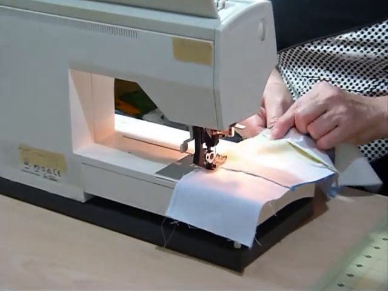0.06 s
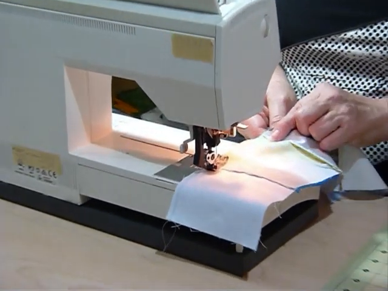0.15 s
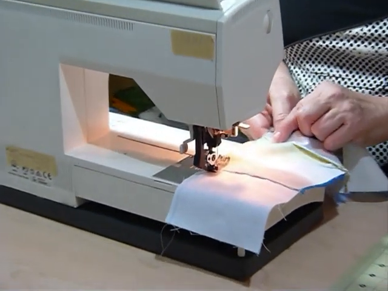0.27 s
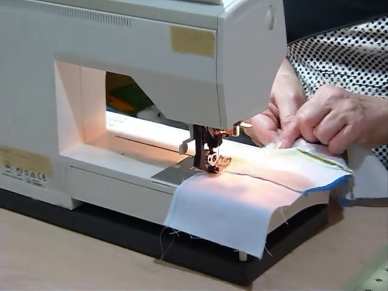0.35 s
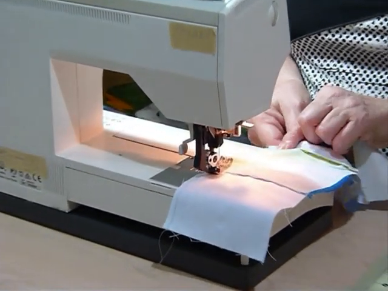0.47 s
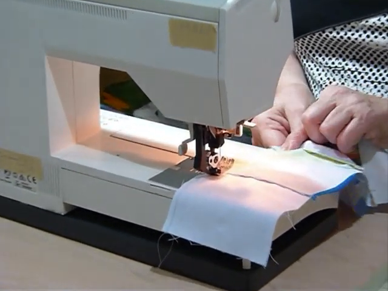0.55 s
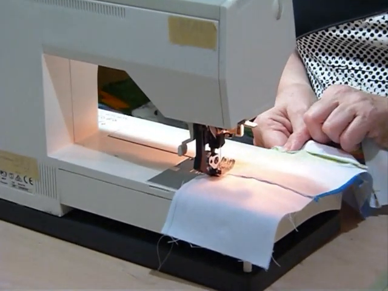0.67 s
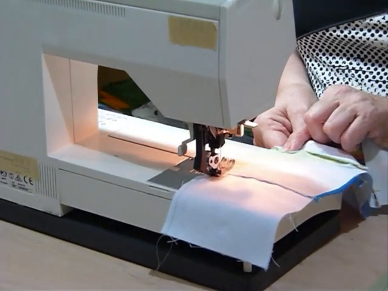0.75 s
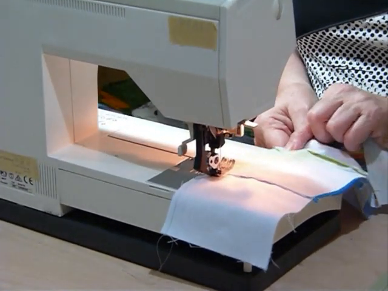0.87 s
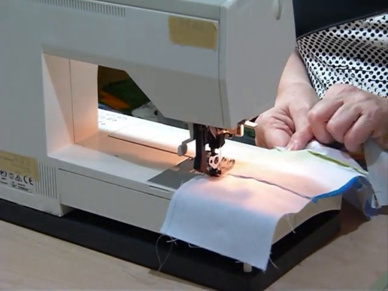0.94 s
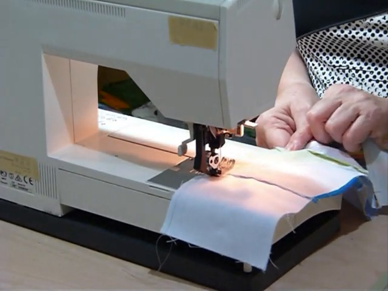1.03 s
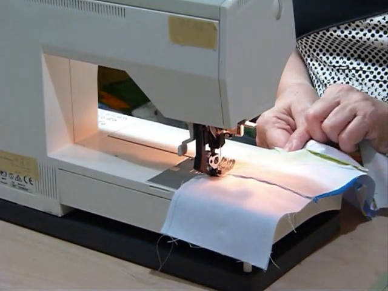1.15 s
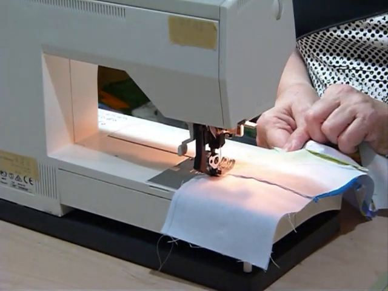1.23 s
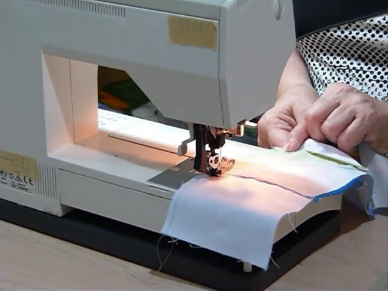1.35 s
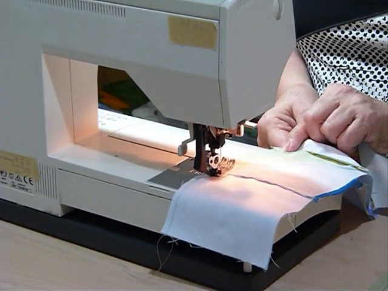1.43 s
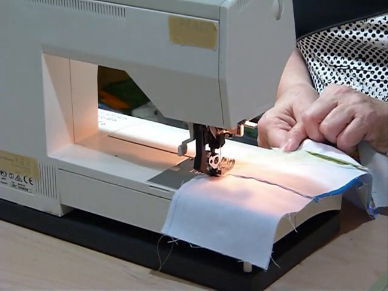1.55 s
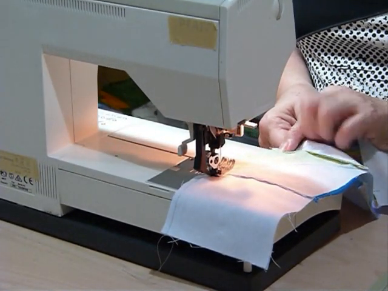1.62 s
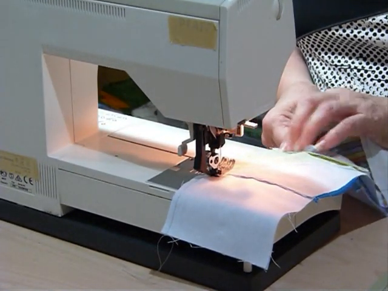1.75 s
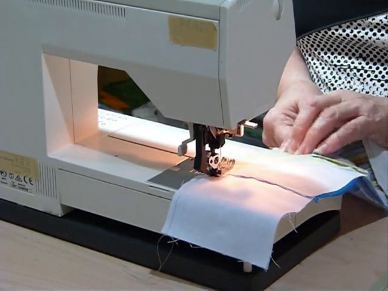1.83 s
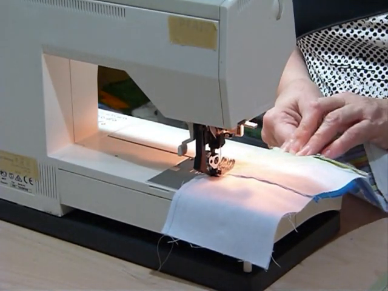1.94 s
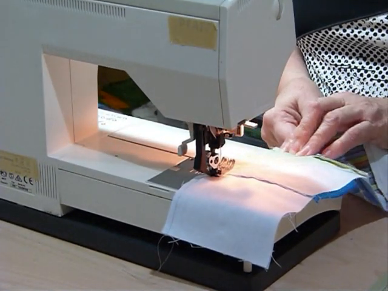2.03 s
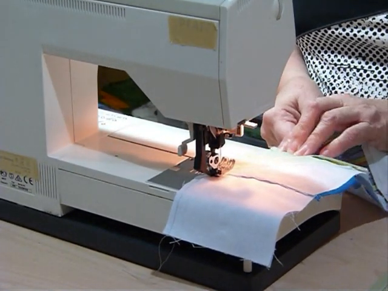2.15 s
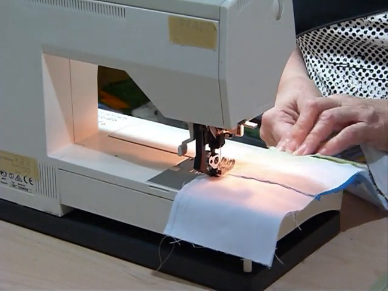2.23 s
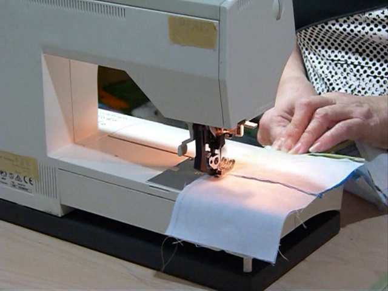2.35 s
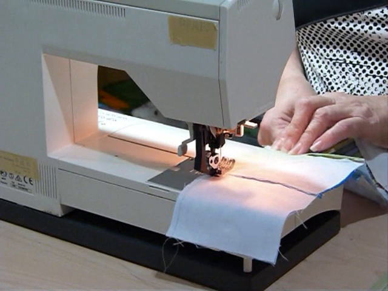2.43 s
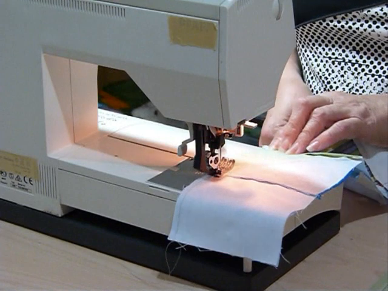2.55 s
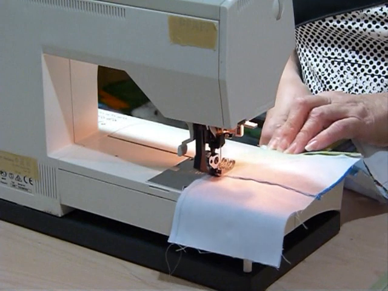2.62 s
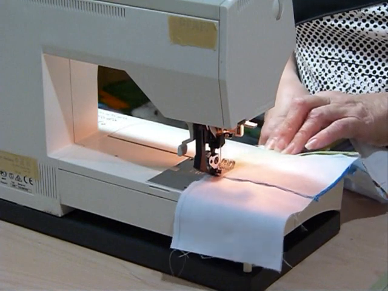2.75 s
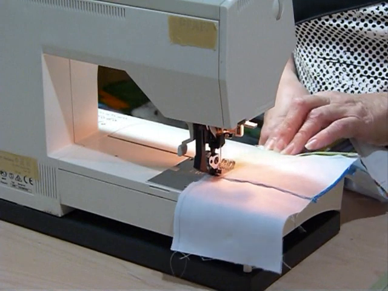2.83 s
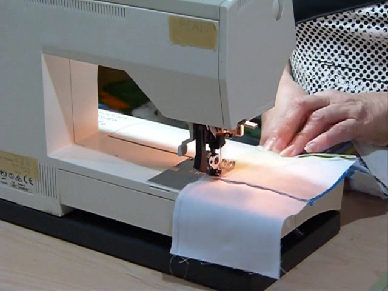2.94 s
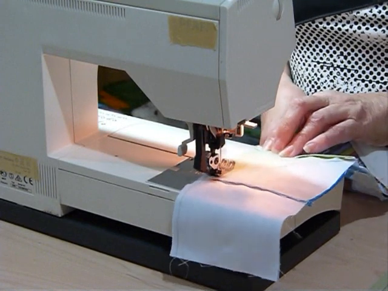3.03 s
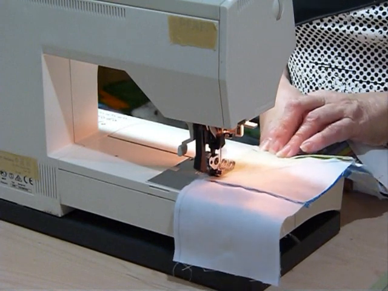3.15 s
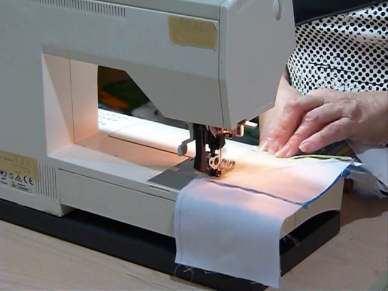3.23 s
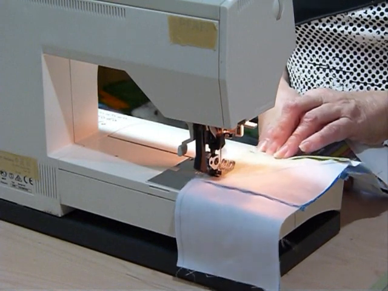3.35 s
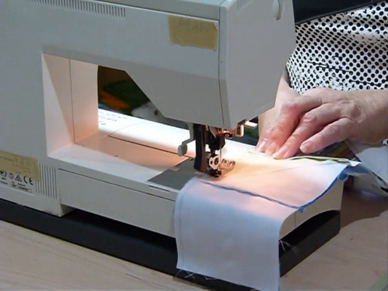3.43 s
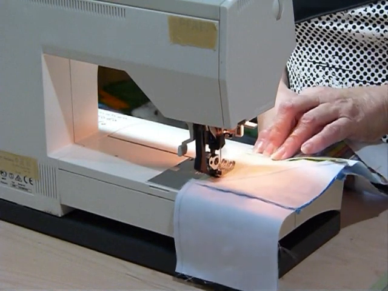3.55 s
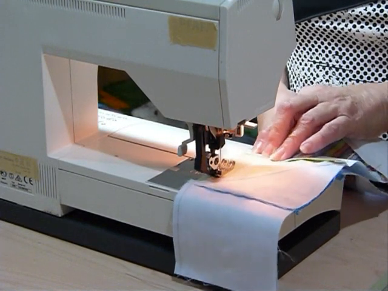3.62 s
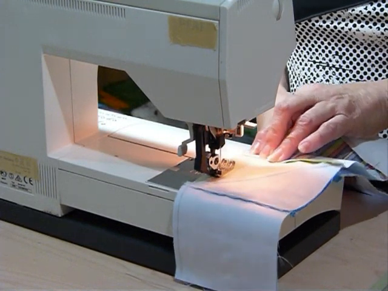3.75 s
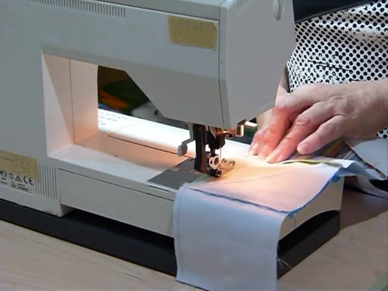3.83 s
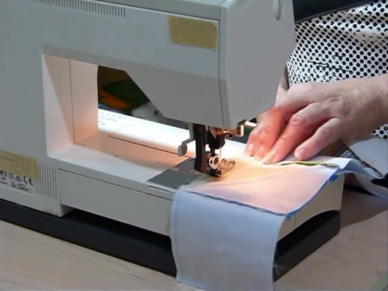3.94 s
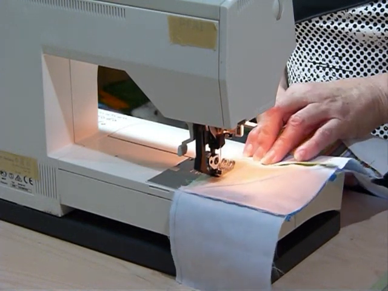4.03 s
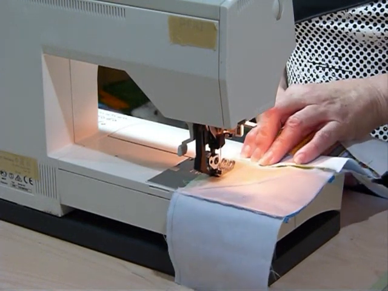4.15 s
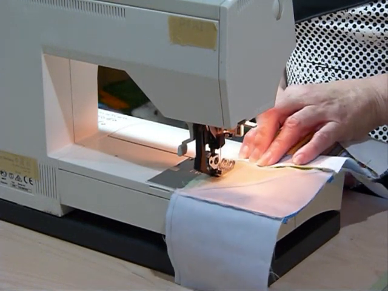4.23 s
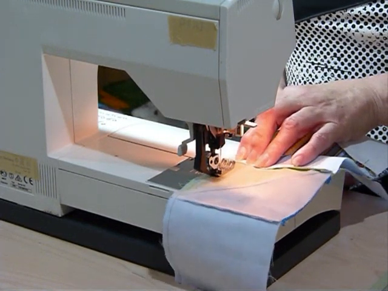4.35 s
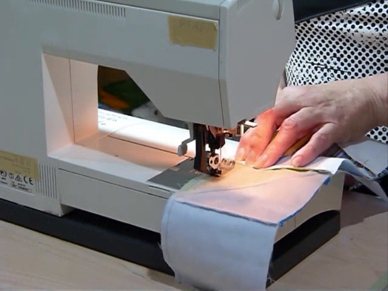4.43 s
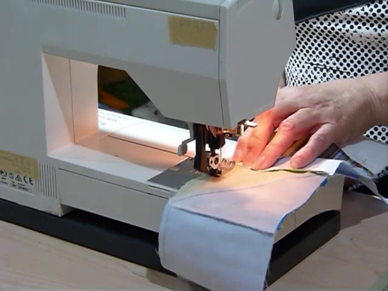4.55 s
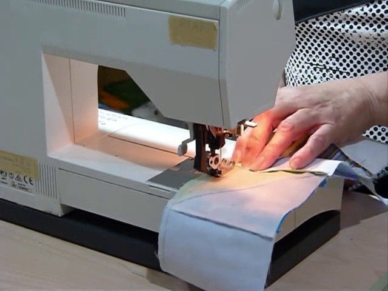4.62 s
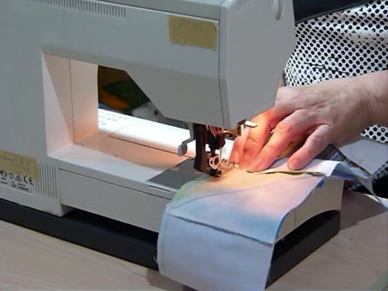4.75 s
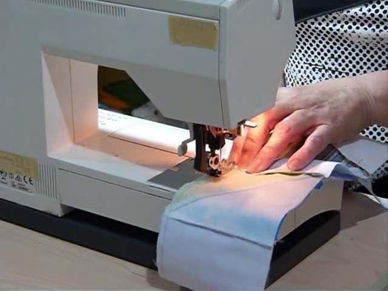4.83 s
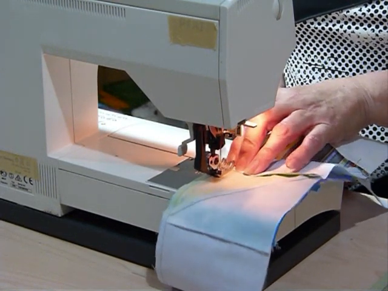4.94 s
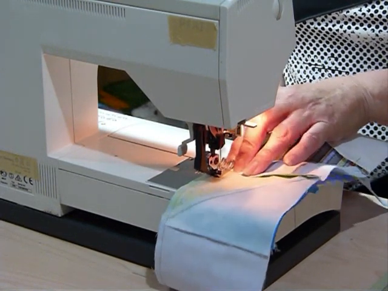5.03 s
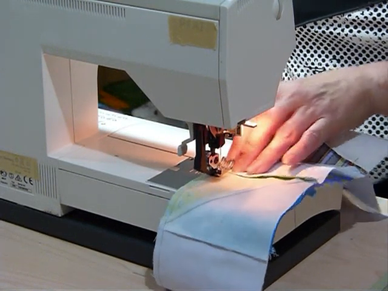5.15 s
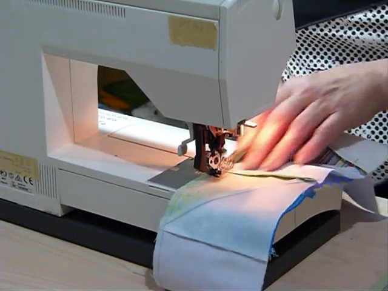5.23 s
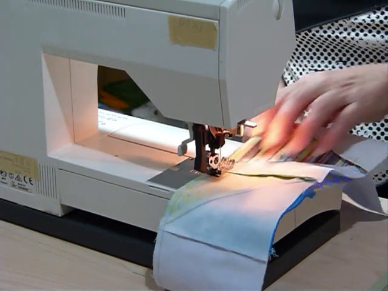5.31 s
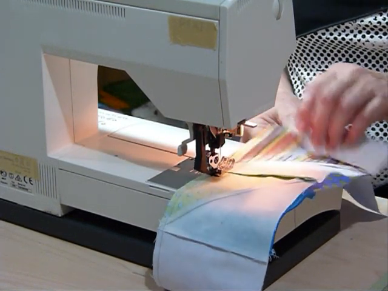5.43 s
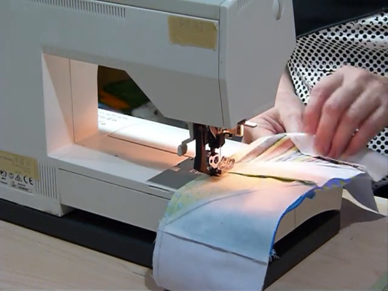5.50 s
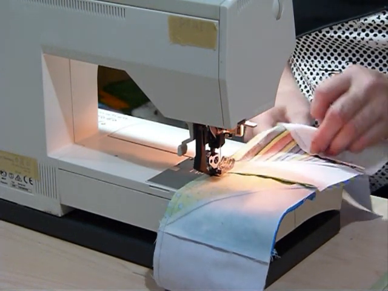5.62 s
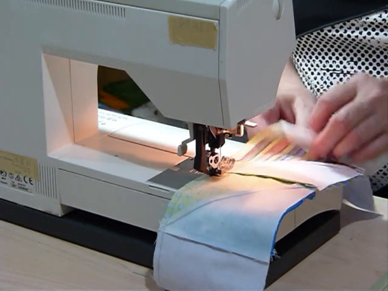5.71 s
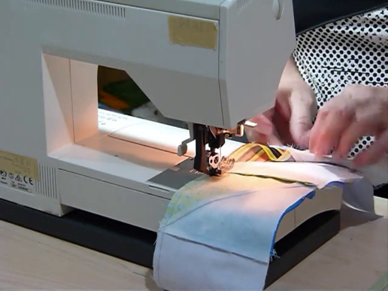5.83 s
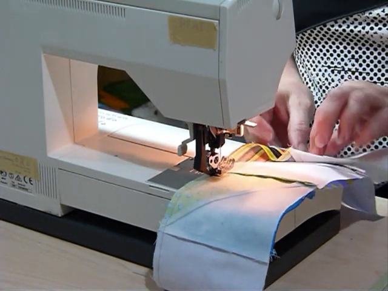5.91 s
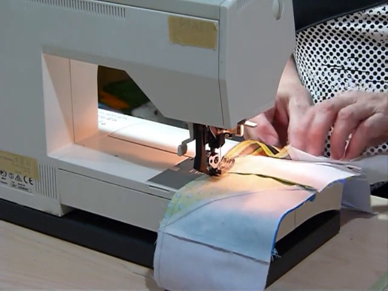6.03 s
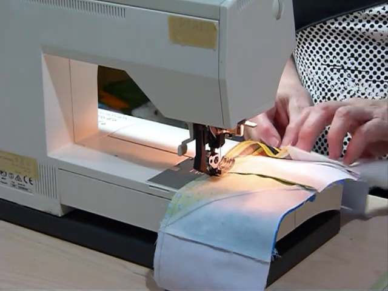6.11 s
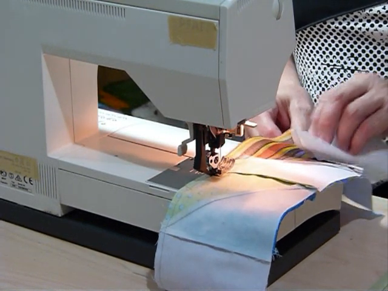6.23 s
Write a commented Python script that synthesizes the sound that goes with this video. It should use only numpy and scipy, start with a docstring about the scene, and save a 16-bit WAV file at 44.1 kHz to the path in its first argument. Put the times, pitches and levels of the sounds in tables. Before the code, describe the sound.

In a quiet room with low hum, hands slide cloth over a sewing machine bed with tiny crackling slips and light knocks on the plastic case. The machine starts at a crawl, quickly speeds into a dense, loud mechanical clatter with a motor whirr, holds steady, then slows through a few separate clacks. A cloth swish, thread snap and soft bumps follow. Close stereo pickup, slightly dull treble.

```python
"""A quiet, humming room, heard by a microphone pair close to a household sewing machine on a table.
First the hands draw cloth over the bed in fine grains and slips, and bump the case so that its modes ring.
At 2.3 s the machine starts at a crawl, then runs up to nearly sixteen stitches a second: its contacts knock
at set points of every turn, over gear rattle, sweeping gear notes, drive and frame tones and a motor whine.
After 5 s it coasts to rest with a few last clacks; cloth, thread and bumps follow, over steady air and hum."""
import sys
import numpy as np
from scipy import signal
from scipy.fft import rfft, irfft
from scipy.io import wavfile

SR = 44100
rng = np.random.default_rng(int(sys.argv[2]) if len(sys.argv) > 2 else 0)


def materialize(psi):
    """Save the field psi as 16-bit PCM at rate SR to the path in sys.argv[1].

    A 1-D psi becomes a single channel; in a 2-D psi each row is a channel.
    """
    bounded = np.clip(np.atleast_2d(psi).T, -1, 1)
    quanta = np.round(bounded * 32767).astype(np.int16)
    wavfile.write(sys.argv[1], SR, quanta)


N = 276488
T = np.arange(N) / SR  # time [s]
COMMON = np.array([[1], [0]])  # puts a sound in the part both microphones share, none in the diffuse part
# Levels in the tables are relative: each sound's own gains and colouring follow.


# how the housing parts' loudness follows speed: (at full speed [dB], lost towards standstill [dB],
# further lost while coasting [dB], gained while straining to speed up [dB])
HOUSING_LAW = (-23.5, 11.5, 8.5, 4)
# the same for the steel parts, same columns
STEEL_LAW = (-30, 24, 6.5, 4)


def linkage():
    """Knocks and gear rattle sound dull through the housing and bright from the steel."""
    thuds = knocks(1, decay_s=.0066, slack_s=.00006, uneven_db=1.8, room_db=-19)
    ticks = knocks(2, decay_s=.003, slack_s=.00002, uneven_db=2.5, room_db=-21)
    dull_rattle = load() * grains(1200, spread_db=1.5, decay_s=0.0021)
    bright_rattle = grains(900, spread_db=2.5, decay_s=0.0028)
    dull = (amp(-4.7) * thuds + amp(-5.9) * dull_rattle) * loudness(HOUSING_LAW)
    bright = (amp(-5.5) * ticks + amp(-3.7) * bright_rattle) * loudness(STEEL_LAW)
    dull += clacks(1, decay_s=0.0071)
    bright += clacks(2, decay_s=0.016)
    return housing(dull) + steel(bright)


# contacts in one stitch, the needle stroke at 0:
# (share of the turn [turns], level in the housing [dB], level in the steel [dB])
CONTACTS = [(-.082, -3.5, -3), (-.05, -6, -2), (-.033, -2, 3.5), (.005, -.5, 1), (.028, 0, -8),
            (.08, -2.5, -3), (.135, -2, 3), (.19, 0, 2), (.25, -2.5, -6), (.33, -2, -6), (.375, -.5, -1),
            (.43, -2.5, -5), (.51, -3, -8), (.58, -2, -2), (.65, -3, -4), (.745, -1, -5), (.8, -1, -2)]


def knocks(column, decay_s, slack_s, uneven_db, room_db):
    """Each contact strikes its own part once a turn, a little early or late, hard or soft."""
    speed, turns = shaft()
    out = np.zeros((2, N))
    for contact in CONTACTS:
        at = np.flatnonzero(np.diff(np.floor(turns - contact[0])))
        late, hard = rng.standard_normal((len(at), 2)).T
        shifted = at + np.round(late * slack_s * SR).astype(int)
        blows = np.zeros((1, N))
        blows[0, shifted] = amp(contact[column] + uneven_db * hard)
        out += signal.oaconvolve(blows, ring(decay_s, room_db, room_s=0.13), axes=1)[:, :N]
    return out / out[:, speed > .5].std()


# hard clacks as play is taken up, the needle meets a seam or the shaft runs down:
# (time [s], level in the housing [dB], level in the steel [dB])
CLACKS = [(2.297, -36.5, -53), (2.325, -35, -41), (2.341, -22.5, -39.5), (2.379, -25, -34),
          (2.418, -37, -36.5), (2.461, -36, -32.5), (2.467, -20.5, -33.5), (2.497, -19, -33),
          (2.565, -33, -31.5), (2.611, -21.5, -44), (2.6415, -25.5, -37), (2.65, -23, -38),
          (2.7248, -22, -37), (2.7837, -22.5, -40.5), (2.926, -28.5, -35), (3.112, -23.5, -39),
          (3.303, -22, -45), (3.429, -22, -31), (3.497, -25.5, -43), (3.561, -22.5, -31), (3.624, -16, -44),
          (3.636, -19, -45), (3.881, -19, -41), (3.944, -20, -48), (4.007, -20, -37), (4.327, -21, -38),
          (4.902, -24, -40), (5.097, -32, -31), (5.118, -22.5, -28.5), (5.191, -21, -30), (5.231, -28, -42),
          (5.26, -32, -34), (5.279, -39, -47), (5.321, -30, -51), (5.352, -34, -56), (5.385, -40, -61),
          (5.439, -39, -52)]


def clacks(column, decay_s):
    """Single harder blows, as the play in the linkage is taken up, a seam is met or the shaft runs down."""
    out = np.zeros((2, N))
    for row in CLACKS:
        add(out, row[0], amp(row[column]) * ring(decay_s))
    return out


# gear load over one stitch: (share of the turn [turns], level [dB])
LOAD = [(.03, 3), (.12, 0), (.4, 1), (.5, -1.5), (.82, -1), (.89, -6)]


def load():
    """Gain of the gear rattle over each turn: slack just before the needle stroke, tight during it."""
    share, db = np.transpose(LOAD)
    return amp(np.interp(shaft()[1], share, db, period=1))


# what the contacts sound through in the housing: (frequency [Hz], level [dB per Hz])
HOUSING_SPECTRUM = [(40, -44), (110, -11.5), (230, -15.5), (290, -11.5), (370, -9), (440, -5), (520, -1.5),
                    (800, -3), (1280, -2), (1530, -9), (1920, -13.5), (2250, -15), (3200, -30),
                    (6000, -37.5)]
# panels of the case: (frequency [Hz], width [Hz], level over the housing [dB])
PANELS = [(286, 18, 7), (305.4, 11, 0), (412.4, 8.6, 2.5), (600, 28, -13.5), (752, 130, -3),
          (1150, 130, -12.5), (1880, 280, -7)]


def housing(x, soft_hz=1300, soft_db=2, hardness=1.0):
    """Slow blows are soft and lose their edge; the panels ring at their own notes."""
    hard = shaft()[0] ** hardness
    softened = signal.filtfilt(*signal.butter(1, soft_hz, fs=SR), x)
    blows = hard * x + (1 - hard) * amp(soft_db) * softened
    return colour(blows + resonances(blows, PANELS), HOUSING_SPECTRUM) * amp(-2.5)


# what the contacts sound through in the steel: (frequency [Hz], level [dB per Hz])
STEEL_SPECTRUM = [(300, -54), (1500, 5), (2400, 5), (3100, 4.5), (4400, 1.5), (5200, 0.5), (5800, 0.5),
                  (6200, -1.5), (7100, -2.5), (7900, -24)]
# notes of the steel parts: (frequency [Hz], width [Hz], level [dB])
STEEL_MODES = [(2910, 39, -14.5), (4360, 86, -23.5), (5660, 200, -10)]


def steel(x):
    """Needle bar and hook click brightly and ring at a few high notes."""
    return colour(x + resonances(x, STEEL_MODES), STEEL_SPECTRUM) * amp(-0.54)


TAKE_UP_S, SETTLE_S = 0.049, 0.018  # the rattle builds at the start and dies at the stop
STRAIN_S = 0.073  # the strain peaks this long after the pedal is pressed


def loudness(law):
    """The faster the shaft and the harder the motor pulls, the harder the parts strike; they ease as it coasts."""
    full_db, slow_db, coast_db, strain_db = law
    building = np.clip((T - START_S) / TAKE_UP_S, 0, 1) ** 2
    moving = building * np.clip((STOP_S - T) / SETTLE_S, 0, 1)
    pressed = (np.maximum(T - PRESS_S, 0) / STRAIN_S) ** 2
    strain = 2 * pressed / (1 + pressed ** 2)
    level_db = full_db - slow_db * (1 - shaft()[0]) - coast_db * coasted() + strain_db * strain
    return moving * amp(level_db)


# the pedal: a start at a crawl, pressed for full speed, released to coast to rest
START_S, PRESS_S, RELEASE_S, STOP_S = 2.285, 2.425, 5.0, 5.47
CRAWL_PER_S, FULL_PER_S = 8, 15.65  # stitches per second
SPIN_UP_S, COAST_CURVE = .185, 2.1  # time constant of the run-up, bend of the slowing
NEEDLE_DOWN_S = 3.625  # one needle stroke falls here


def shaft():
    """Speed as a share of full speed, and the turns made, whole at each needle stroke."""
    driven = FULL_PER_S - (FULL_PER_S - CRAWL_PER_S) * np.exp(-np.maximum(T - PRESS_S, 0) / SPIN_UP_S)
    rate = (T > START_S) * driven * (1 - coasted() ** COAST_CURVE)
    turns = np.cumsum(rate) / SR
    return rate / FULL_PER_S, turns - turns[round(NEEDLE_DOWN_S * SR)]


def coasted():
    """Share of the coast's time that has passed: 0 under power, 1 at rest."""
    return np.clip((T - RELEASE_S) / (STOP_S - RELEASE_S), 0, 1)


# sharp ticks of the needle glancing off the foot and plate: (time [s], level [dB], pitch [Hz])
NEEDLE_TICKS = [(2.6419, -23, 3490), (2.726, -25, 4300), (2.926, -25.5, 4360), (3.0555, -20, 4300),
                (3.1885, -17.5, 5780), (3.366, -25, 5650), (3.8577, -22, 4480), (4.0057, -24, 5870),
                (4.0797, -22.5, 4180), (4.1762, -21.5, 4470), (4.2587, -25.5, 5430), (4.325, -24.5, 5300),
                (4.7078, -20.5, 3780), (4.9125, -19, 4360)]
TICK_RING_DB, TICK_NOTE_DB, TICK_DECAY_S = -7.5, -12, .0045


def needle(size=4000):
    """A glancing needle gives a bright snap and a brief note."""
    out, t = np.zeros((2, N)), T[:size]
    for s, db, hz in NEEDLE_TICKS:
        around_pitch = [(hz / 6, -20), (hz / 2, -5), (hz, 0), (7500, -5), (9000, -40)]
        snap = colour(ring(TICK_DECAY_S, room_db=-24), around_pitch)
        note = np.sqrt(2) * np.sin(2 * np.pi * hz * t) * np.exp(-t / TICK_DECAY_S) * COMMON
        add(out, s, amp(db + TICK_RING_DB) * snap)
        add(out, s, amp(db + TICK_NOTE_DB) * note)
    return out


# meshing gears: (teeth passing per stitch, level against the housing [dB], half-width [Hz])
GEARS = [(46.8, -26.5, 160), (57.6, -16, 64), (86.1, -17, 29), (120.4, -14, 130)]
BELT_GRIPS_S, KICK_SPEED = 2.56, .68  # until the belt grips, the motor keeps at least this share of full speed


def gears(slow_db=8.5, coast_db=-7, dulling=2, lowest_hz=230):
    """The motor's teeth mesh in fuzzy notes that glide with its speed, stand out at a crawl and ease as it coasts."""
    speed = shaft()[0]
    # at first the motor runs ahead on a slipping belt
    speed = np.where(T < BELT_GRIPS_S, np.maximum(speed, KICK_SPEED), speed)
    turns = np.cumsum(speed) * FULL_PER_S / SR
    main_teeth = GEARS[1][0]
    whirr = np.zeros(N)
    for teeth, db, half_width_hz in GEARS:
        fade = speed ** (dulling * abs(teeth / main_teeth - 1))
        whirr += amp(db) * fade * waver(half_width_hz) * np.sin(2 * np.pi * teeth * turns)
    # the case radiates no lower notes
    whirr = signal.lfilter(*signal.butter(4, lowest_hz, "high", fs=SR), whirr)
    balance = amp(slow_db * np.minimum(2 * (1 - speed), 1) + coast_db * coasted())
    return np.sqrt(2) * whirr * load() * balance * loudness(HOUSING_LAW) * COMMON


# panels singing as gear notes pass: (middle [s], length [s], level [dB], pitch [Hz], glide [Hz per s])
SINGS = [(2.352, 0.078, -40, 586.4, 499.5), (2.493, .07, -33, 921, 901), (5.164, 0.1, -36, 1228, -400),
         (5.216, 0.035, -33, 846, -1500), (5.279, 0.033, -34.5, 660, -1500),
         (5.317, 0.021, -32.5, 576, -2000), (5.397, 0.056, -42, 249, -500)]


def singing(rough=.55, rough_hz=130):
    """As the speed changes, the gear notes sweep past panels, and each growls out for a moment."""
    notes = np.zeros(N)
    for s, length_s, db, hz, glide in SINGS:
        since = T - s
        phase = 2 * np.pi * (hz + glide * since / 2) * since + rough * waver(rough_hz / 2)
        growl = 1 + rough * waver(rough_hz)
        notes += swells([(s, length_s, db)], 2) * growl * np.sin(phase)
    return np.sqrt(2) * notes * COMMON


# hum of the drive: (multiple of the stitch rate, level [dB])
DRIVE_TONES = [(2, -62), (3, -56), (7, -55), (8, -39.8), (9, -56), (13, -56)]
# the drive starts to hum about this share of full speed, over this span of it;
# unloaded, it needs this much more speed by the end of the coast
SHAKE_SPEED, SHAKE_SPAN, SHAKE_SLACK = .908, .024, .19


def drive():
    """Near full speed the drive shakes and hums at multiples of the stitch rate."""
    threshold = SHAKE_SPEED + SHAKE_SLACK * coasted()
    shaking = 1 / (1 + np.exp((threshold - shaft()[0]) / SHAKE_SPAN))
    return stitch_tones(DRIVE_TONES) * shaking


# tones of the frame: (multiple of the stitch rate, level [dB])
FRAME_TONES = [(17, -50), (18, -46), (21, -47), (24, -48), (25, -38.5), (26, -47), (32, -47), (36, -43),
               (39, -44), (42, -44), (45, -42.5), (48, -48), (54, -46), (58, -44.5), (66, -45.5), (70, -49),
               (72, -46), (79, -45.5), (84, -47), (87, -47)]


def frame(sharpness=22):
    """The frame rings at multiples of the stitch rate, only close to full speed."""
    return stitch_tones(FRAME_TONES) * shaft()[0] ** sharpness


def stitch_tones(table, flutter=0.068):
    """Fluttering tones locked to the turning shaft."""
    turns = shaft()[1]
    out = np.zeros(N)
    for multiple, db in table:
        tone = np.cos(2 * np.pi * (multiple * turns + rng.random()))
        out += amp(db) * (1 + flutter * waver(7.9)) * tone
    return np.sqrt(2) * out * COMMON


# motor whine: (frequency at full speed [Hz], level [dB])
WHINES = [(5880, -50), (5637, -58)]


def motor_whine(whirr_db=-52, steepness=12):
    """The motor whines far above the stitch rate, gliding with speed, with a fuzzy skirt."""
    speed = shaft()[0]
    out = np.zeros(N)
    for hz, db in WHINES:
        fuzzy = amp(db) + amp(whirr_db) * waver(100)
        out += fuzzy * np.sin(2 * np.pi * np.cumsum(hz * speed) / SR)
    return np.sqrt(2) * out * speed ** steepness * COMMON


# bumps on the plastic case and table: (time [s], level [dB], pitch [Hz], decay [s], tick level [dB])
BUMPS = [(0.5419, -41, 1160, 0.0051, -40), (0.546, -51, 980, 0.0018, -32.5),
         (0.549, -27.5, 1047, 0.0042, -36.5), (0.568, -52, 396, 0.0059, -62),
         (1.611, -32.5, 600, 0.0024, -41), (1.613, -38.5, 323, 0.02, -47), (1.928, -35.5, 482, 0.014, -50),
         (1.931, -37, 680, 0.0072, -49), (1.942, -41, 538, 0.038, -58), (2.068, -46, 535, 0.012, -63),
         (2.092, -46, 245, 0.018, -71), (5.305, -26, 600, .011, -52), (5.402, -37, 273, .016, -69),
         (5.492, -46, 748, .012, -47), (6.035, -41, 1385, 0.014, -57), (6.0395, -35.5, 600, 0.009, -60),
         (6.039, -45, 305, 0.018, -64), (6.062, -36, 603, 0.019, -56), (6.175, -52, 720, 0.023, -65)]
# notes of the plastic case: (frequency [Hz], level [dB], longest decay [s])
CASE_MODES = [(323, 6.5, 0.0097), (463, 0, 0.013), (603, -5, .014), (845, 4.5, 0.0093), (1114, 0, .008),
              (1370, 1.5, .007), (1810, 3.5, 0.0037), (2320, 9.5, 0.0076)]


def bumps(skirt_db=-12, note_db=-3, case_db=-8, clatter_db=-6, contact_s=0.00024, lowest_hz=170, size=11000):
    """A tick, then the note of the spot that is hit, with the case's modes and a hollow clatter around it."""
    out, ticks, t = np.zeros((2, N)), np.zeros((2, N)), T[:size]
    for s, db, hz, decay_s, tick_db in BUMPS:
        hollow = [(hz / 12, -42), (hz / 4, -18), (hz / 2, -8), (hz / 0.56, -1), (hz * 0.79, 0),
                  (hz * 2.0, skirt_db), (hz * 4, -26), (hz * 10, -44)]
        note = np.sqrt(2) * np.sin(2 * np.pi * hz * t) * np.exp(-t / decay_s)
        case = np.zeros(size)
        for mode_hz, mode_db, life_s in CASE_MODES:
            fading = np.exp(-t / min(life_s, 2 * decay_s))
            case += amp(mode_db + read(hollow, mode_hz)) * np.sin(2 * np.pi * mode_hz * t) * fading
        struck = amp(db + note_db) * note + amp(db + case_db) * case
        add(out, s, struck * (1 - np.exp(-t / contact_s)) * COMMON)
        add(out, s, amp(db + clatter_db) * colour(ring(decay_s, room_db=-26.0), hollow))
        add(ticks, s, amp(tick_db) * ring(decay_s / 2, room_db=-49))
    body = signal.lfilter(*signal.butter(3, lowest_hz, "high", fs=SR), out)
    return body + colour(ticks, HISS_SPECTRUM)


# strokes of the hands sliding cloth over the bed: (middle [s], length [s], rub level [dB], hiss level [dB])
STROKES = [(.06, 0.12, -55, -60), (.35, 0.24, -53, -60.5), (.58, 0.16, -54.5, -67),
           (1.26, 0.33, -54.5, -62), (1.63, 0.07, -47, -54), (1.95, 1, -56, -57.5),
           (2.28, 0.29, -54.5, -58), (5.54, 0.16, -43.5, -53.5), (5.74, 0.26, -61, -63.5),
           (6.17, 0.33, -59, -63.5)]
# colour of the rub: (frequency [Hz], level [dB per Hz])
RUB_SPECTRUM = [(100, -6.5), (280, 0), (480, 0), (750, 0), (1150, -5), (1600, -10.5), (3000, -28.5)]
# colour of the hiss and of the bumps' ticks: (frequency [Hz], level [dB per Hz])
HISS_SPECTRUM = [(600, -11.5), (1900, 6.5), (2700, 5.5), (3700, 4), (5300, 2.5), (7000, 0), (7900, -25)]
# the cloth whispers as it is lifted: (middle [s], length [s], level [dB])
LIFTS = [(5.75, 0.32, -44)]
# narrow band of that whisper: (frequency [Hz], width [Hz], level [dB])
LIFT_BAND = [(1845, 190, 0)]


def cloth():
    """Fingers rub the cloth over the bed; its weave catches in fine grains and single ticks."""
    rub = amp(-1.0) * grains(1200, spread_db=1.0, decay_s=0.0034) * swells(STROKES, 2)
    hiss = amp(-0.5) * grains(3700, spread_db=-1.0, decay_s=0.0015) * swells(STROKES, 3)
    whisper = grains(3300, spread_db=1.0, decay_s=.001) * swells(LIFTS, 2)
    lift = resonances(whisper, LIFT_BAND)
    return colour(rub, RUB_SPECTRUM) + colour(hiss, HISS_SPECTRUM) + lift + catches() + pulls()


# fine rustle as the cloth is drawn: (middle [s], length [s], level [dB])
RUSTLES = [(.1, 0.23, -55.5), (.32, 0.2, -59.5), (.54, 0.18, -56.5)]
# threads catch and slip while the cloth is first drawn into place: (time [s], level [dB])
CATCHES = [(0.0352, -49.5), (0.067, -49), (0.079, -49), (0.0912, -41), (0.129, -45), (.149, -49),
           (0.176, -51), (.2079, -51), (0.234, -49), (.26, -59), (0.2904, -48), (0.316, -45), (0.339, -53),
           (.3875, -56), (0.399, -46), (.4584, -52), (0.4845, -44), (0.508, -50), (0.59, -48.5),
           (.6255, -54), (0.648, -54)]
# notes of the bed under the cloth: (frequency [Hz], width [Hz], level [dB])
BED_MODES = [(1150, 110, 3.5), (2380, 240, -8), (3130, 400, -14.5)]
# colour of the catches: (frequency [Hz], level [dB per Hz])
CATCH_SPECTRUM = [(200, -9.5), (500, -5), (1100, 0), (1800, 5), (2450, 4), (3100, 1), (4200, -7.5),
                  (7500, -26.5)]


def catches(decay_s=0.0047, body_db=-9, tick_db=-1.0):
    """Stick and slip: the drawn cloth lets go in a fine rustle and small ticks that ring the bed."""
    out = slips() * swells(RUSTLES, 2)
    for s, db in CATCHES:
        add(out, s, amp(db + tick_db) * ring(decay_s, room_db=-30))
    return colour(amp(body_db) * out + resonances(out, BED_MODES), CATCH_SPECTRUM) * amp(3.0)


SLIPS_PER_S, SLIP_JITTER, SLIP_UNEVEN_DB, SLIP_DECAY_S = 75, .3, 3.8, .0018  # jitter: spread of log intervals


def slips(count=4):
    """An uneven run of tiny dry clicks as the weave slips thread by thread."""
    pace, hard = rng.standard_normal((int(SLIPS_PER_S * N / SR), 2)).T
    at = (np.cumsum(np.exp(SLIP_JITTER * pace)) * SR / SLIPS_PER_S).astype(int)
    sizes = amp(SLIP_UNEVEN_DB * hard)
    out = np.zeros((2, N))
    for k in range(count):  # the clicks take turns among a few rings
        train = np.bincount(at[k::count], sizes[k::count], N)[:N]
        out += signal.oaconvolve(train[None], ring(SLIP_DECAY_S, room_db=-20.5), axes=1)[:, :N]
    return unit(out)


# quick pulls of cloth and thread: (time [s], level [dB], decay [s])
PULLS = [(5.49, -40.5, 0.005), (5.5, -44, 0.014), (5.5, -41.5, 0.033)]
# colour of the zip: (frequency [Hz], level [dB per Hz])
ZIP_SPECTRUM = [(700, -23), (2000, 2.5), (3200, 1), (4500, 5), (5600, 0), (7300, -7), (7900, -21)]


def pulls():
    """The thread zips taut in bright little snaps."""
    out = np.zeros((2, N))
    for s, db, decay_s in PULLS:
        add(out, s, amp(db) * ring(decay_s))
    return colour(out, ZIP_SPECTRUM)


# room hum: (frequency [Hz], level [dB])
HUM = [(48.4, -66.5), (86.1, -64.5), (129.2, -69.5), (247.6, -67)]
# swells of the drone: (middle [s], length [s], level [dB])
DRONE_SWELLS = [(.25, 0.18, -65), (1.22, 0.45, -63), (1.79, 0.22, -56.5)]
DRONE_HZ, DRONE_REST_DB, DRONE_WAVER = 172.6, -69, .35  # waver in radians rms
# colour of the air noise: (frequency [Hz], level [dB per Hz])
AIR_SPECTRUM = [(25, -1), (60, 1), (110, -8), (300, 0.5), (600, -8), (1100, -4), (2000, -16.5), (6500, -18),
                (7900, -32)]


def room():
    """Soft air noise and the wavering hum of appliances."""
    hum = sum(amp(db) * np.sin(2 * np.pi * hz * T + 0.37 * waver(9.5)) for hz, db in HUM)
    drone_gain = amp(3.0) * swells(DRONE_SWELLS, 2, rest_db=DRONE_REST_DB)
    drone = drone_gain * np.sin(2 * np.pi * DRONE_HZ * T + DRONE_WAVER * waver(24.0))
    air = amp(-57.5) * colour(rng.standard_normal((2, N)), AIR_SPECTRUM)
    return air + np.sqrt(2) * (hum + drone) * COMMON


def amp(db):
    """Decibels to amplitude."""
    return 10 ** (np.asarray(db) / 20)


def unit(x):
    """Scales to rms 1."""
    return x / np.sqrt(np.mean(x ** 2) + 1e-20)


def read(points, hz):
    """Joins points on a log-frequency axis."""
    f, value = np.transpose(points)
    return np.interp(np.log(hz + 1), np.log(f + 1), value)


def add(mix, s, sound):
    """Lays a sound into the mix from second s on, cut at the end."""
    part = mix[:, round(s * SR):][:, :sound.shape[1]]
    part += sound[:, :part.shape[1]]


def colour(x, spectrum, size=4096):
    """Causal filter that keeps the power of white noise."""
    log_gain = np.log(amp(read(spectrum, abs(np.fft.fftfreq(size, 1 / SR)))))
    minimum_phase = np.exp(signal.hilbert(log_gain).conj())
    taps = np.fft.ifft(minimum_phase).real[:size // 2]
    return signal.oaconvolve(x, taps[None] / np.linalg.norm(taps), axes=1)[:, :N]


def resonances(x, modes):
    """What a set of modes rings with when x drives it."""
    return sum(amp(db) * signal.lfilter(*signal.iirpeak(hz, hz / width, fs=SR), x) for hz, width, db in modes)


def waver(limit_hz):
    """Random wandering of rms 1, no faster than the limit."""
    spectrum = rfft(rng.standard_normal(N))
    return unit(irfft(spectrum * (np.fft.rfftfreq(N, 1 / SR) < limit_hz), N))


def swells(rows, column, rest_db=-140):
    """Gain of smooth rises and falls, each at half height over its length; their powers add."""
    power = amp(rest_db) ** 2
    for row in rows:
        half_lengths = 2 * (T - row[0]) / row[1]
        power = power + amp(row[column]) ** 2 * .5 ** (2 * half_lengths ** 2)
    return np.sqrt(power)


def ring(decay_s, room_db=-21, room_s=0.12, size=11000):
    """Dense modes of a struck part die fast; the room holds a weak tail."""
    t = T[:size]
    direct = np.exp(-t / decay_s)
    tail = amp(room_db) * np.exp(-t / room_s) * (1 - direct)
    return rng.standard_normal((2, size)) * (direct + tail)


def grains(per_s, spread_db, decay_s, count=8):
    """Random tiny impacts of uneven size on several small parts."""
    struck = rng.random(N) < per_s / SR
    sizes = amp(spread_db * np.minimum(rng.exponential(1, N), 4)) * struck
    part = rng.integers(0, count, N)
    out = np.zeros((2, N))
    for k in range(count):
        hits = (sizes * (part == k))[None]
        out += signal.oaconvolve(hits, ring(decay_s, room_db=-12.0), axes=1)[:, :N]
    return unit(out)


# likeness of the microphone pair: (frequency [Hz], likeness [-1 to 1])
LIKENESS = [(100, .99), (450, .985), (1000, .95), (2000, .85), (4000, .85), (7500, .8)]
# phase by which the left leads, before scaling by aside: (frequency [Hz], lead [rad])
LEAD = [(30, 0.035), (250, -0.068), (500, -0.25), (1000, -0.78), (1500, -0.77), (3500, -1.35),
        (5500, 0.098), (7500, 0.38)]
# left over right: (frequency [Hz], level [dB])
TILT = [(100, -1.5), (450, -0.96), (1000, -0.092), (2000, 0.1), (4000, 1.8), (7500, 1.2)]


def microphones(x, aside, diffuse_db):
    """Row one reaches both microphones, with a phase lead that grows with aside; row two is where they differ."""
    hz = np.fft.rfftfreq(N, 1 / SR)
    like = np.clip(read(LIKENESS, hz), 0, .995)
    shares = np.sqrt([(1 + like) / 2, (1 - like) / 2])
    common, diffuse = rfft(x) * shares * amp([[0], [diffuse_db]])
    lean = amp(read(TILT, hz) / 2) * np.exp(.5j * aside * read(LEAD, hz))
    return irfft(np.array([(common + diffuse) * lean, (common - diffuse) / lean]), N)


def scene():
    """The machine stands in front, the hands work to its right, the room lies all around."""
    machine = linkage() + needle() + gears() + drive() + frame() + motor_whine() + singing()
    hands = bumps() + cloth()
    return (microphones(machine, aside=0.8, diffuse_db=3.5)
            + microphones(hands, aside=1.18, diffuse_db=5.5)
            + microphones(room(), aside=1.4, diffuse_db=9.0))


EDGE_HZ = 7750


def record(dry):
    """The recorder's band limit: a steep low-pass."""
    taps = signal.firwin(401, EDGE_HZ, window=("kaiser", 9), fs=SR)
    return signal.oaconvolve(dry, taps[None], "same", axes=1)


dry = scene()
out = record(dry)
materialize(out)
```